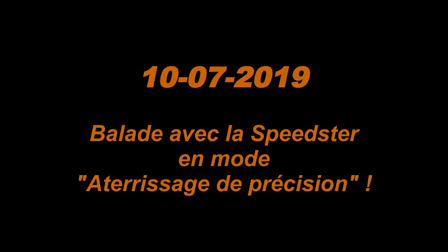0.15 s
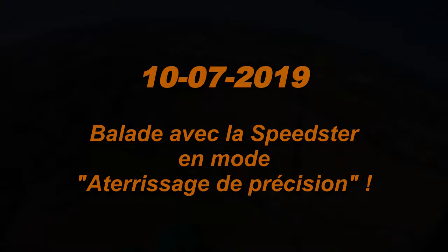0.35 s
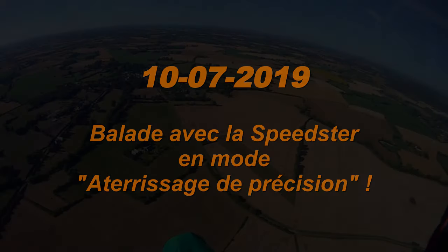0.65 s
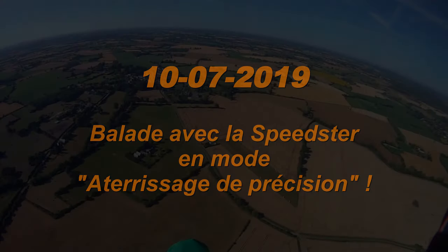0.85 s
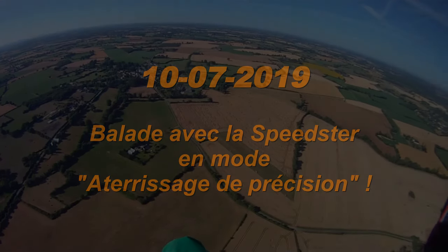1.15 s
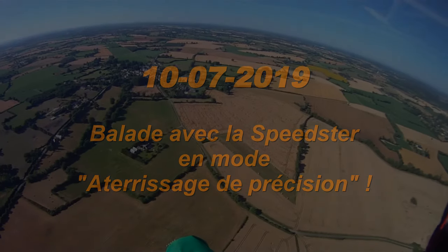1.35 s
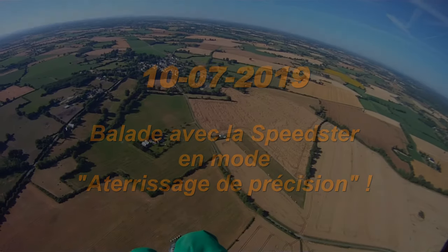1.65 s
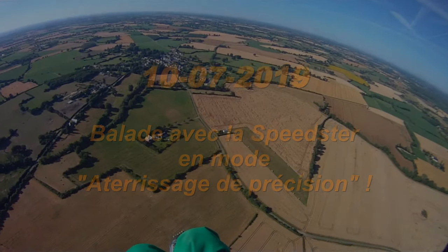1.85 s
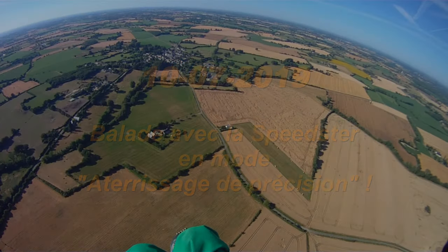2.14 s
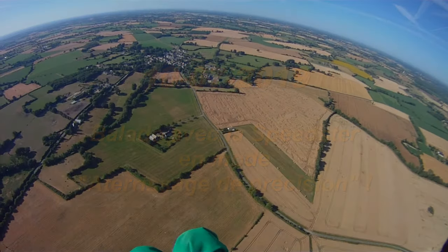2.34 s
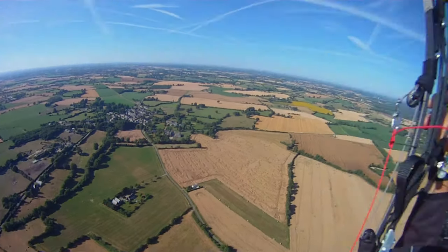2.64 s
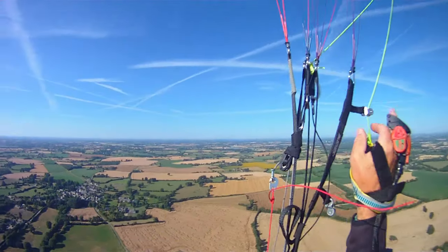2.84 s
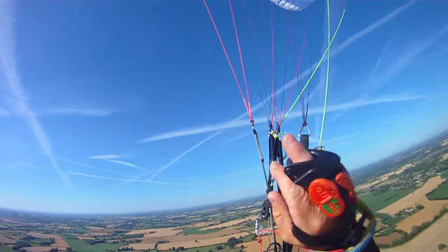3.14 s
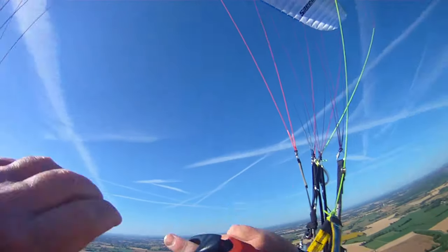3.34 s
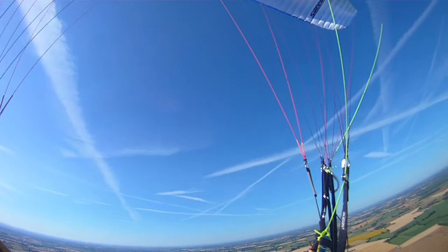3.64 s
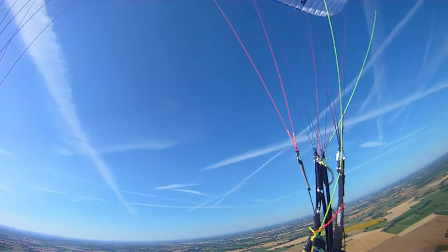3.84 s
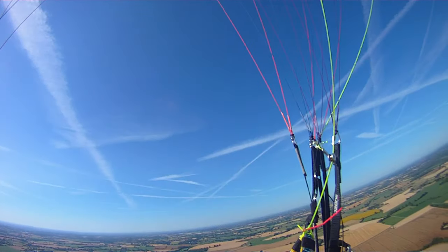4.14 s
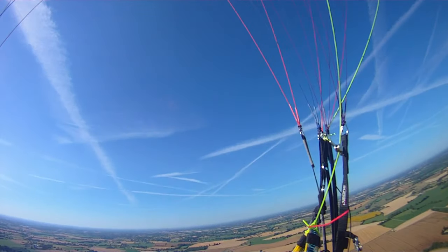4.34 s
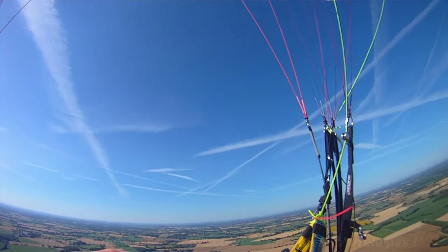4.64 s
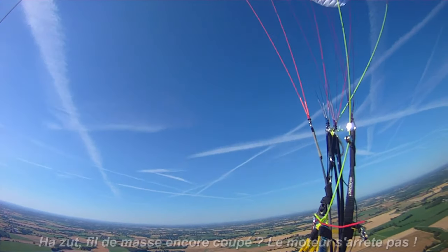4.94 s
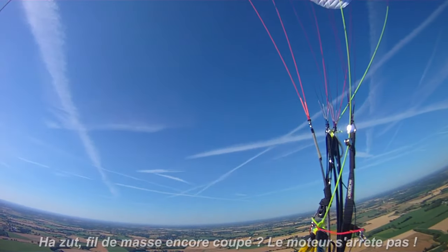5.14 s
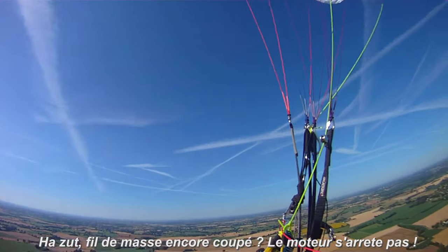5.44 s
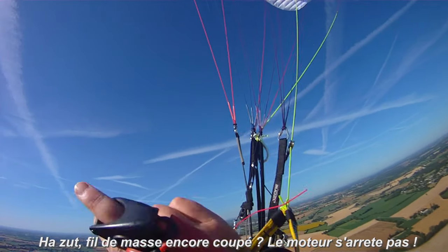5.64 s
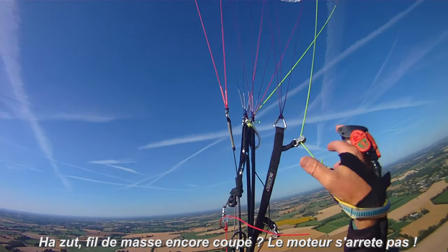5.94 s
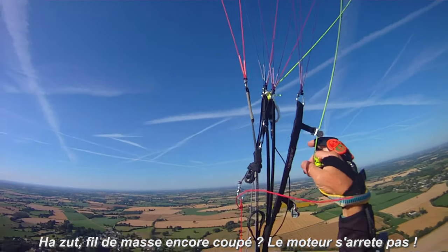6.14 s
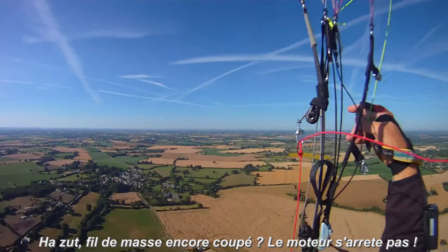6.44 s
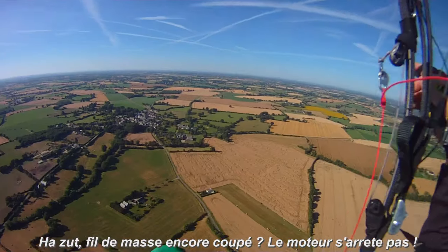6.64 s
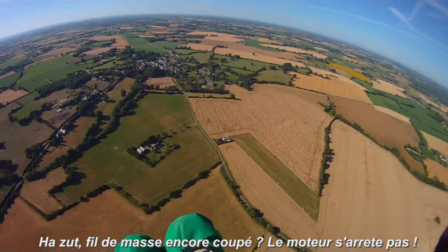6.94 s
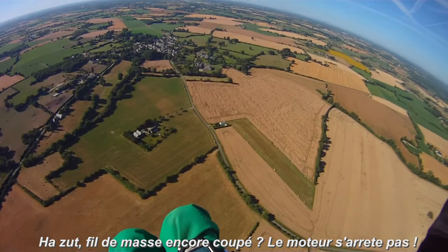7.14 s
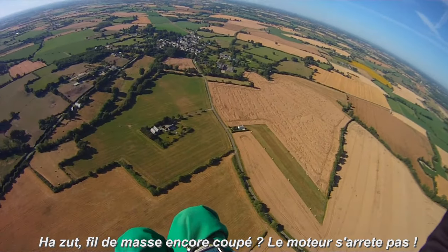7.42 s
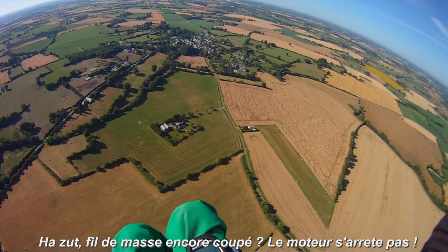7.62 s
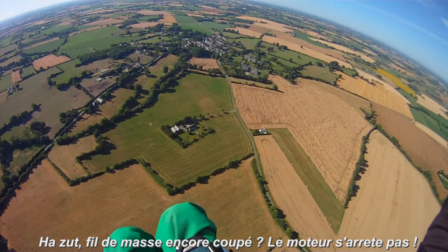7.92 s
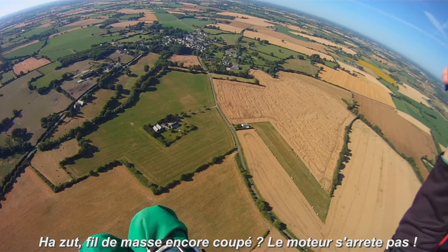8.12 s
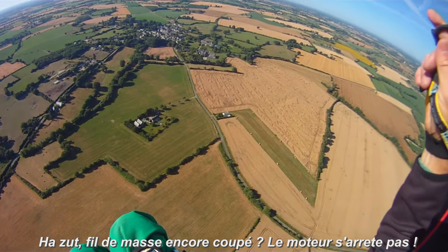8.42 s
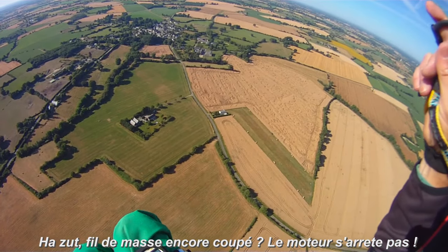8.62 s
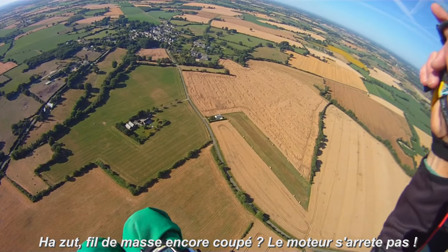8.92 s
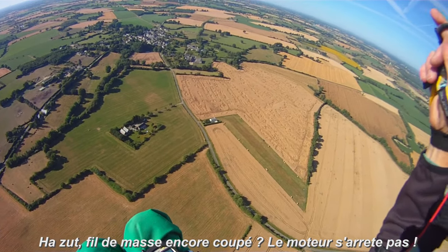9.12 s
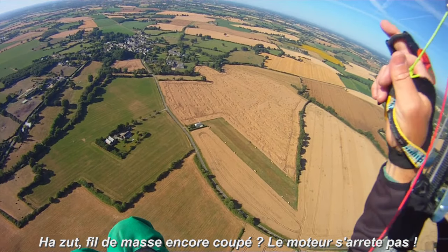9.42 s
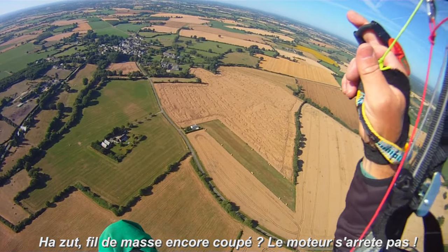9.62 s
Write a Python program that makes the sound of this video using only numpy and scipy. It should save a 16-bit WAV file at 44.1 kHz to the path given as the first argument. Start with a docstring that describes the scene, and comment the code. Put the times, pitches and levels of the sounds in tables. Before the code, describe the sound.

From silence, a broad wind roar fades in on a small enclosed microphone worn on a flyer's head. When the head turns aside, the wind drops abruptly and a small two-stroke engine comes forward, rattling and hunting up and down, with two housing taps, lumpy gusts and low pops. A quieter stretch follows, then wind tears back in and roars harder to the end.

```python
"""Powered glider from the helmet

Over fields, a microphone in a helmet camera's housing; a small two-stroke idles behind the pilot, hunting
up and down: noise blasts, one a turn, ring resonances of silencer, outlet pipe and fins.
Coloured noise roars as wind on the port; when the head turns out of the stream it breaks into lumps and pops.
Now and then something taps the housing, as decaying sines. The sound fades in."""
import sys
import numpy as np
from scipy import signal
from scipy.fft import rfft, irfft, next_fast_len
from scipy.io import wavfile
from scipy.ndimage import uniform_filter1d, map_coordinates

SR = 44100
rng = np.random.default_rng(int(sys.argv[2]) if len(sys.argv) > 2 else 0)


def inscribe(sig):
    """Save sig as 16-bit PCM at rate SR to the path in sys.argv[1].

    A 1-D sig is mono; a 2-D sig holds one channel per row.
    Samples are clipped to [-1, 1] before scaling.
    """
    pcm = np.round(np.clip(np.atleast_2d(sig).T, -1, 1) * 32767)
    wavfile.write(sys.argv[1], SR, pcm.astype(np.int16))


def magnitude_from_level(level_db):
    """Linear magnitude for a level in decibels (20 dB per decade)."""
    exponent = np.asarray(level_db, float) / 20
    return 10 ** exponent


N = 430857

# crankshaft speed, hunting at idle: (time [s], speed [turns/s])
CRANK_SPEED = [(0, 28), (.68, 32.63), (1.29, 31.78), (1.56, 37.48), (2.02, 36.99), (2.44, 29.8),
               (2.97, 28.22), (3.31, 32.5), (4.1, 36.53), (4.58, 31.16), (4.97, 31), (5.72, 35.9),
               (6.16, 31.71), (6.51, 26.06), (7.48, 36.91), (7.7, 35.71), (8.23, 30.65), (9.01, 30.21),
               (9.77, 23.03)]
# firings that bark above the rest: (time [s], gain [dB] before each layer's own scaling)
BARKS = [(3.725, 5), (3.755, 2.5), (3.785, 1.5), (3.925, 1), (4.035, 2.5), (5.382, 2.5), (5.469, 3.5)]
# engine layers by name: (level at idle, head forward [dB], gain with the ear turned to the engine [dB],
# gain per extra turn a second [dB])
ENGINE_LAYERS = {"silencer": (-61, 11.24, 0.5), "outlet": (-65.5, 9.6, 0.41), "rattle": (-54.5, 3.2, 0.047),
                 "hum": (-51.5, .1, .05)}
# ear turned toward the engine, harness shaking the housing: (time [s], share [about 0-1], shake [dB])
EAR = [(0, .02, -3), (2.5, 0.02, -1), (2.8, 0.92, 0), (3.2, 1, 0.5), (3.75, 1.02, 0), (4.4, 1, -2.5),
       (4.9, 0.86, -3), (5.6, 0.96, -6), (6.05, 1.02, -2), (6.25, 0.82, 3.5), (6.55, 0.66, 0.5),
       (6.9, 0.04, 4.5), (7.6, .02, -1.5), (8.6, 0.64, 1), (9.77, 0.1, -15)]
# silencer and frame resonances: (frequency [Hz], width [Hz], level [dB])
SILENCER_PEAKS = [(1279, 134, 1.5), (1424, 110, -3), (1906, 68, -5.5), (2375, 73, -10)]
# outlet pipe resonances, one pass of two: (frequency [Hz], width [Hz], level [dB])
OUTLET_PEAKS = [(2800, 360, -0.5), (3210, 380, 0.5), (3490, 390, -6)]
# cooling fins and cage: (frequency [Hz], width of one pass of two [Hz], level [dB])
FIN_PEAKS = [(3740, 2700, -7), (4910, 380, -4.5), (5240, 68, -1.5), (5630, 770, -3), (6200, 210, 2),
             (6740, 530, 2.5), (7010, 49, 8.5), (7310, 1300, -5.5), (7780, 52, -1.5), (8270, 820, -11),
             (9200, 1900, -22.5), (12400, 6000, -39)]
# the housing's note when shaken or blown, one pass of two: (frequency [Hz], width [Hz], level [dB])
HOUSING_NOTE = [(1530, 155, 0)]
# taps on the housing: (time [s], peak level [dB])
TAPS = [(3.2531, -2.5), (3.3877, -5), (6.555, -9), (6.6967, -13.5), (6.9658, -9.5)]
# housing modes when tapped: (frequency [Hz], relative level [dB], 60 dB decay [s])
HOUSING_MODES = [(1568, 12.5, 0.018), (1450, 2.5, 0.022), (680, -40, .02), (1940, -20, 0.012),
                 (2300, -22, .025), (2470, -28, .02), (2725, -9.5, 0.016)]
# a small metal tick: (time [s], peak level [dB])
TICKS = [(5.2296, -20)]
# modes of the tick: (frequency [Hz], relative level [dB], 60 dB decay [s])
TICK_MODES = [(5560, -1, 0.014), (6030, -2, .01), (6600, -2, 0.016), (7400, -10, 0.0081), (8400, -6, .008),
              (3650, -8, .012), (4560, -17, .008), (2780, -11, 0.016), (11000, -20, .006),
              (13500, -26, .005)]
# stream on the port while it faces forward: (time [s], roar level [dB])
STREAM = [(0, -32), (.6, -36), (1.25, -35.5), (1.7, -39), (2.45, -38), (2.69, -32), (6.585, -32),
          (6.63, -30.5), (6.7, -28.5), (6.85, -33.5), (7.1, -38), (7.9, -42), (8.3, -36.5), (8.8, -34),
          (9.2, -28.5), (9.39, -27), (9.45, -23.5), (9.77, -25)]
# gusts that curl round to the sheltered port:
# (start [s], hold [s], roar level [dB], spread of the eddies [dB])
GUSTS = [(2.71, 0.076, -45, 4.5), (2.816, 0.06, -39, 1.5), (2.927, 0.19, -49, 3.5),
         (3.178, 0.023, -42.5, 3), (3.24, 0.053, -47, 5), (3.328, 0.071, -40.5, 4.5),
         (3.562, 0.027, -46.5, 1), (3.63, 0.067, -51, 4.5), (3.87, 0.034, -45, 6), (3.933, .04, -47, 7),
         (3.968, 0.016, -40.5, 6), (4.063, .02, -41, 8), (4.11, 0.051, -40.5, 4), (4.194, .03, -45, 5),
         (4.251, .015, -44, 2), (4.283, 0.058, -34.5, 5.5), (4.358, 0.029, -38.5, 2),
         (4.412, 0.019, -35.5, 4.5), (4.472, 0.032, -34.5, 4), (4.54, 0.036, -39.5, 6.5),
         (4.805, 0.019, -52, 6), (4.86, .01, -53, 9), (4.979, 0.016, -51, 12), (5.07, .01, -74, 5),
         (5.125, 0.015, -55, 5), (5.187, .01, -59, 12), (5.247, 0.0091, -53, 10), (5.32, .03, -52, 9),
         (5.485, .04, -46, 7.5), (5.546, 0.017, -44, 9), (5.613, .015, -46, 1), (5.663, 0.032, -39.5, 4),
         (5.712, 0.045, -29.5, 1.5), (5.765, 0.025, -29.5, 4), (5.814, 0.058, -36, 2),
         (5.892, 0.026, -45, 1), (5.973, 0.09, -46, 5), (6.208, 0.13, -68, -1), (6.36, 0.18, -56.5, 0)]
# the stream skims the port's edge: (time [s], approach [s], retreat [s])
SKIMS = [(2.681, 0.076, 0.048), (6.6, 0.27, 0.047)]
# eddies slapping the port, from faint pops in the lulls to hard slaps:
# (time [s], level of the push [dB], pitch [Hz])
TIMED_POPS = [(2.8268, -39, 427), (2.842, -25.5, 540), (2.859, -36, 420), (3.1848, -31, 600),
              (3.559, -30, 620), (3.5819, -27.5, 430), (3.865, -35.5, 510), (3.9546, -27.5, 710),
              (3.993, -33, 410), (4.059, -21.5, 730), (4.111, -27.5, 520), (4.126, -28, 590),
              (4.1587, -27.5, 520), (4.1985, -25, 510), (4.208, -27, 477), (4.243, -20.5, 574),
              (4.2849, -29, 560), (4.314, -18.5, 506), (4.334, -21, 580), (4.3562, -23.5, 550),
              (4.3728, -30, 560), (4.4183, -25, 437), (4.4359, -17, 660), (4.4706, -22, 588),
              (4.4938, -26, 520), (4.5095, -22, 500), (4.5345, -19.5, 400), (4.8057, -35.5, 370),
              (4.831, -41, 350), (4.8619, -35, 352), (4.988, -40, 450), (5.144, -44, 330),
              (5.184, -43, 400), (5.319, -38, 348), (5.5, -32, 520), (5.526, -31, 540), (5.554, -34, 318),
              (5.562, -35, 620), (5.705, -22, 500), (5.7232, -17, 448), (5.7926, -21, 550),
              (5.8123, -19, 580), (9.411, -22, 600), (9.452, -24, 500), (9.485, -18, 700),
              (9.526, -23, 550), (9.585, -15, 700), (9.675, -13, 600)]
# roar facing the stream: (frequency [Hz], relative density [dB per Hz])
ROAR_COLOUR = [(30, -68), (108, -24.5), (230, -6), (585, -1.5), (1000, -7), (1300, -11), (2000, -17.5),
               (3000, -26.5), (5000, -32.5), (9000, -84)]
# duller roar in the lee: (frequency [Hz], relative density [dB per Hz])
LEE_COLOUR = [(30, -49), (108, -12), (200, -1), (380, -0.5), (600, -6), (1000, -10), (2000, -17),
              (3000, -22), (9000, -70)]
# low thump of the wind: (frequency [Hz], relative density [dB per Hz])
THUMP_COLOUR = [(15, -37), (30, -24), (60, -12), (110, -5), (160, 1.5), (300, -58)]
# wind hiss: (frequency [Hz], relative density [dB per Hz])
HISS_COLOUR = [(1500, -10), (2700, -6), (4000, -6.5), (6100, 4), (6950, 1.5), (7500, -10), (8350, -16.5),
               (10000, -22.5), (11500, -35), (13000, -62), (15300, -37)]
# bright spits in the stream: (frequency [Hz], relative density [dB per Hz])
SPIT_COLOUR = [(900, -32), (1800, 11), (3500, 1), (6000, 3.5), (7400, -18), (10500, -10), (12500, -25),
               (15000, -29)]
# the stream tearing at the port's edge: (frequency [Hz], relative density [dB per Hz])
TEARING_COLOUR = [(710, -29), (1200, 0.5), (2020, -3), (4340, -14.5), (6600, -6), (8140, -31.5),
                  (13000, -38)]
# fade-in: (start [s], end [s])
FADE = (0.29, 2.7)

FIRING_TURNS = 0.165  # where in the turn the exhaust port opens
AFTERKNOCK_S = 0.0066  # a second knock follows every firing
IDLE_TURNS_PER_S = 32
CHAMBER_SPREAD_DB = 2  # each silencer chamber, from firing to firing
LEAVE_S, LEAVE_SWING_S = 2.71, 0.013  # the port leaves the stream
RETURN_S, RETURN_SWING_S = 6.585, 0.044  # and comes back
GUST_RISE_DB_PER_S, GUST_FALL_DB_PER_S, CALM_DB = 548, 409, -60.5
STEADY_SPREAD_DB, CALM_SPREAD_DB = 0.86, 1.5  # eddies facing the stream, and in the calm
STRONG_DB, ROUGHENS = -29.5, 0.22  # above this level the stream flutters: dB of spread per dB
LEE_SHARE = 0.71  # dull share of the sheltered roar's power
TEARING_DB = 1  # against the roar, at the edge itself
HISS_DB, EDGE_HISS_DB = -14, 7  # base level against the roar; gain while skimming the edge
LEE_HISS_DB, HISS_FALL_DB_PER_S = 0, 596  # gain in the lee; there hiss falls faster than the roar
THUMP_DB, MIDDLING_DB, THUMP_FOLLOWS = -77.5, -40, 0.76  # base at a middling roar; dB per dB of roar
LEE_THUMP_DB, THUMP_SMOOTH_S = 20.5, 0.062  # gain in the lee; smoothing of the level
RANDOM_POPS, RANDOM_POP_DB, RANDOM_POP_HZ = 24, 2, 490  # count, middle level over the roar, middle pitch
POP_FRONT_DB = 1.5  # factor on the steep front of a slap
SPITS_PER_S, SPIT_DECAY_S = 260, 0.0012
CRACKLE_DB, CRACKLE_GROWS = -24, 0.59  # against the roar at STRONG_DB; dB per dB of stream
TOP_HZ = 15300  # upper band limit


def unit(x):
    """Scaled to rms 1."""
    return x / np.sqrt(np.mean(x ** 2) + 1e-20)


def noise():
    """White noise for the whole scene."""
    return rng.standard_normal(N)


def curves(rows):
    """One value per sample for each column after the time."""
    knots, *columns = np.transpose(rows)
    return [np.interp(np.arange(N) / SR, knots, column) for column in columns]


def wobble(rate):
    """A smooth random curve, rate knots a second."""
    knots = rng.standard_normal(int(N * rate / SR) + 4)
    return map_coordinates(knots, [np.arange(N) * rate / SR])


def filtered(x, response):
    """x times a complex response of frequency."""
    m = next_fast_len(N + SR // 2)
    return irfft(rfft(x, m) * response(np.fft.rfftfreq(m, 1 / SR)), m)[:N]


def coloured(x, points):
    """x through a spectrum of (frequency [Hz], level [dB]) points on a log axis."""
    f, db = np.transpose(points)
    return filtered(x, lambda hz: magnitude_from_level(np.interp(np.log(hz + 1), np.log(f), db, -120, -120)))


def resonant(x, peaks, order=1):
    """x through a sum of causal resonances with alternating signs, passed order times."""
    def response(f):
        total = 0
        for k, (centre, width, db) in enumerate(peaks):
            band = 1j * f * width
            total = total + (-1) ** k * magnitude_from_level(db) * band / (centre * centre - f * f + band)
        return total ** order
    return filtered(x, response)


def twice(x, peaks):
    """Resonances passed twice, for steep skirts."""
    return resonant(x, peaks, order=2)


def engine():
    """One blast a turn through silencer and outlet pipe; the fins rattle and the housing hums along."""
    (speed,), (ear, shake_db) = curves(CRANK_SPEED), curves(EAR)

    def layer_db(name):
        """The layer's level follows the ear and the crankshaft speed."""
        forward_db, turned_db, rev_db = ENGINE_LAYERS[name]
        return forward_db + turned_db * ear + rev_db * (speed - IDLE_TURNS_PER_S)

    turn = np.cumsum(speed) / SR - FIRING_TURNS
    count = np.floor(turn).astype(int) + 1
    # a row per firing: exhaust, outlet, housing and fins together, each fin, each chamber
    chance = rng.standard_normal((count.max() + 2, 3 + len(FIN_PEAKS) + len(SILENCER_PEAKS)))

    def burst(lag, fall_db, floor_db, size_db, after_db, smooth_s=0.00042):
        """Noise that swells once a turn, knocks again and dies to a floor; lag and fall are per turn."""
        phase = turn - lag
        blast = magnitude_from_level(size_db[np.floor(phase).astype(int) + 1] - fall_db * (phase % 1))
        afterknock = magnitude_from_level(after_db) * np.roll(blast, int(AFTERKNOCK_S * SR))
        blast = np.maximum(blast, afterknock)
        swell = uniform_filter1d(blast, size=1 + int(smooth_s * SR))
        return (swell + magnitude_from_level(floor_db)) * noise()

    uneven_db = 1.4 * chance
    bark_s, bark_db = np.transpose(BARKS)
    uneven_db[count[(bark_s * SR).astype(int)], :2] = bark_db[:, None]

    # the port opening is one click a turn
    crack = np.diff(count, prepend=count[0]) * magnitude_from_level(uneven_db[count, 0])
    exhaust = magnitude_from_level(21) * crack + burst(.01, fall_db=46, floor_db=-19, size_db=uneven_db[:, 0], after_db=-7)
    outlet = magnitude_from_level(17) * crack + burst(0, fall_db=50, floor_db=-15, size_db=1.3 * uneven_db[:, 1], after_db=-4)

    # every firing favours other chambers of the silencer
    voiced = np.zeros(N)
    for k, peak in enumerate(SILENCER_PEAKS):
        favour = magnitude_from_level(CHAMBER_SPREAD_DB * chance[count, -1 - k])
        voiced += (-1) ** k * resonant(exhaust * favour, [peak])
    muffled = filtered(voiced, lambda hz: (1j * hz / (1100 + 1j * hz) / (1 + 1j * hz / 3500)) ** 3)

    shaking = burst(0.019, fall_db=14, floor_db=-5, size_db=uneven_db[:, 2], after_db=1)
    hum = twice(shaking, HOUSING_NOTE)

    # each fin is shaken by its own amount at every firing
    clatter = magnitude_from_level(2.1 * wobble(250))
    shaken_db = 2.5 * chance[:, 3:] + 2.2 * chance[:, 2:3]
    rattle = np.zeros(N)
    for (hz, width, db), size_db in zip(FIN_PEAKS, shaken_db.T):
        shaking = burst(0, fall_db=34, floor_db=-13, size_db=size_db, after_db=0, smooth_s=.002)
        rattle += magnitude_from_level(db) * twice(clatter * shaking, [(hz, width, 0)])

    return (magnitude_from_level(layer_db("silencer")) * unit(muffled)
            + magnitude_from_level(layer_db("outlet")) * unit(twice(outlet, OUTLET_PEAKS))
            + magnitude_from_level(layer_db("rattle")) * unit(rattle)
            + magnitude_from_level(layer_db("hum") + shake_db) * unit(hum))


def struck(events, modes, attack):
    """Every blow rings the same decaying modes; neighbours start opposed, so a close pair swells and beats."""
    out, t = np.zeros(N + SR), np.arange(SR // 10) / SR
    ring = np.zeros(len(t))
    for k, (hz, db, t60) in enumerate(modes):
        ring += (-1) ** k * magnitude_from_level(db - 60 * t / t60) * np.sin(2 * np.pi * hz * t)
    ring = ring * (1 - np.exp(-(t / attack) ** 2))
    for s, db in events:
        out[round(s * SR):][:len(t)] -= magnitude_from_level(db) * ring / np.abs(ring).max()
    return out[:N]


def knocks():
    """Taps ring the housing's modes; a small metal tick rings higher ones."""
    return struck(TAPS, HOUSING_MODES, attack=.0008) + struck(TICKS, TICK_MODES, attack=.0003)


def head():
    """Shelter 0-1 of the port, and how near the stream is to skimming its edge (0-1)."""
    t = np.arange(N) / SR
    left = np.clip((t - LEAVE_S) / LEAVE_SWING_S + .5, 0, 1)
    not_back = np.clip((RETURN_S - t) / RETURN_SWING_S + .5, 0, 1)
    edge = np.zeros(N)
    for s, approach, retreat in SKIMS:
        edge += np.exp(-(s - t).clip(0) / approach - (t - s).clip(0) / retreat)
    return left * not_back, edge


def gusts(fall_db_per_s=GUST_FALL_DB_PER_S):
    """Level of the sheltered roar (dB) and spread of its eddies (dB): each gust rises, holds and falls."""
    t = np.arange(0, N, 64) / SR
    start, hold, db, spread_db = np.transpose(GUSTS)[:, :, None]
    rise_db = GUST_RISE_DB_PER_S * (start - t).clip(0)
    fall_db = fall_db_per_s * (t - start - hold).clip(0)
    power = magnitude_from_level(2 * (db - rise_db - fall_db))
    calm = magnitude_from_level(2 * CALM_DB)
    total = power.sum(0) + calm
    mean_spread_db = ((power * spread_db).sum(0) + calm * CALM_SPREAD_DB) / total
    return [np.interp(np.arange(N) / SR, t, v) for v in (10 * np.log10(total), mean_spread_db)]


def pops():
    """A slap is one pressure push inside a short puff of roar and hiss."""
    half = SR // 50
    push, puff, t = np.zeros(N + SR), np.zeros(N + SR), np.arange(-half, half) / SR
    when, size, pitch = rng.random((RANDOM_POPS, 3)).T
    when = LEAVE_S + when * (RETURN_S - LEAVE_S)
    random_db = gusts()[0][(when * SR).astype(int)] + RANDOM_POP_DB + 6 * (size - .5)
    random_hz = RANDOM_POP_HZ * np.exp(.6 * (pitch - .5))
    slaps = [*TIMED_POPS, *np.transpose([when, random_db, random_hz])]
    for (s, db, hz), sign in zip(slaps, rng.standard_normal(len(slaps))):
        u = t * hz * np.pi * np.sqrt(2)
        body = (1 - u * u) * np.exp(-u * u / 2)
        front = magnitude_from_level(POP_FRONT_DB) * u * np.exp(-3 * u * u)
        first = round(s * SR) - half
        push[first:][:len(t)] += magnitude_from_level(db) * np.sign(sign) * (body + front)
        puff[first:][:len(t)] += magnitude_from_level(db - 12.0) * np.exp(-(t / 0.0034) ** 2)
    roar = unit(coloured(noise(), ROAR_COLOUR))
    hiss = magnitude_from_level(HISS_DB) * unit(coloured(noise(), HISS_COLOUR))
    return push[:N] + puff[:N] * (roar + hiss)


def wind():
    """Eddies of all sizes cross the port as coloured noise, steady in the stream and lumpy out of it."""
    (aside, edge), (gust_db, spread_db), (stream_db,) = head(), gusts(), curves(STREAM)
    roar_db = stream_db + aside * (gust_db - stream_db)
    facing_spread_db = STEADY_SPREAD_DB + ROUGHENS * (stream_db - STRONG_DB).clip(0)
    lumpy_db = (1 - aside) * facing_spread_db + aside * spread_db
    eddies_db = lumpy_db * unit(np.tanh(.2 * wobble(25) + .4 * wobble(70) + .4 * wobble(180)))
    # about the same mean power however lumpy
    lumps = magnitude_from_level(eddies_db - lumpy_db ** 2 * np.log(10) / 20)

    dull_share = LEE_SHARE * aside
    facing = unit(coloured(noise(), ROAR_COLOUR))
    lee = unit(coloured(noise(), LEE_COLOUR))
    roar = (np.sqrt(1 - dull_share) * facing + np.sqrt(dull_share) * lee) * lumps

    lee_hiss_db = LEE_HISS_DB + gusts(HISS_FALL_DB_PER_S)[0] - gust_db
    hiss_db = HISS_DB + EDGE_HISS_DB * edge + aside * lee_hiss_db
    hiss = unit(coloured(noise(), HISS_COLOUR)) * lumps ** 1.14 * magnitude_from_level(hiss_db + 1.1 * wobble(150))

    # the stream blows the housing's own note
    hum = unit(twice(noise(), HOUSING_NOTE)) * magnitude_from_level(-18.0 + 1.7 * wobble(90))
    tearing = unit(coloured(noise(), TEARING_COLOUR)) * magnitude_from_level(TEARING_DB) * edge

    # bright spits at random moments, only while the port is in the stream
    times, sizes = rng.random((int(SPITS_PER_S * N / SR), 2)).T
    spits = np.bincount((times * N).astype(int), sizes ** 2, N)
    decay = np.exp(-np.arange(SR // 50) / (SPIT_DECAY_S * SR))
    spits = signal.fftconvolve(spits, decay)[:N] * (1 - aside)
    crackle_db = CRACKLE_DB + CRACKLE_GROWS * (stream_db - STRONG_DB)
    crackle = unit(coloured(noise() * spits, SPIT_COLOUR)) * magnitude_from_level(crackle_db)

    thump_db = THUMP_DB + THUMP_FOLLOWS * (roar_db - MIDDLING_DB) + LEE_THUMP_DB * aside
    thump_db = uniform_filter1d(thump_db, size=1 + int(THUMP_SMOOTH_S * SR))
    thump = unit(coloured(noise(), THUMP_COLOUR)) * magnitude_from_level(thump_db + 3.3 * wobble(22))
    return magnitude_from_level(roar_db) * (roar + hiss + hum + tearing + crackle) + thump


def scene():
    """Engine, knocks, pops and wind at one microphone."""
    return (engine() + knocks() + pops() + wind())[None]


def low_pass(x):
    """Removes everything above the highest recorded frequency."""
    return signal.sosfilt(signal.butter(12, 16250, fs=SR, output="sos"), x)


def record(dry):
    """Microphone hiss, a straight fade from silence and the upper band limit."""
    hiss_colour = [(60, -12), (300, 0), (800, -1), (2000, -12), (11000, -19), (TOP_HZ, -17)]
    hiss = magnitude_from_level(-63.5) * unit(coloured(noise(), hiss_colour))
    start, end = FADE
    fade = np.clip((np.arange(N) / SR - start) / (end - start), 0, 1)
    mix = filtered((dry[0] + hiss) * fade, lambda hz: hz < TOP_HZ)
    return low_pass(mix[None])


dry = scene()
out = record(dry)
inscribe(out)
```